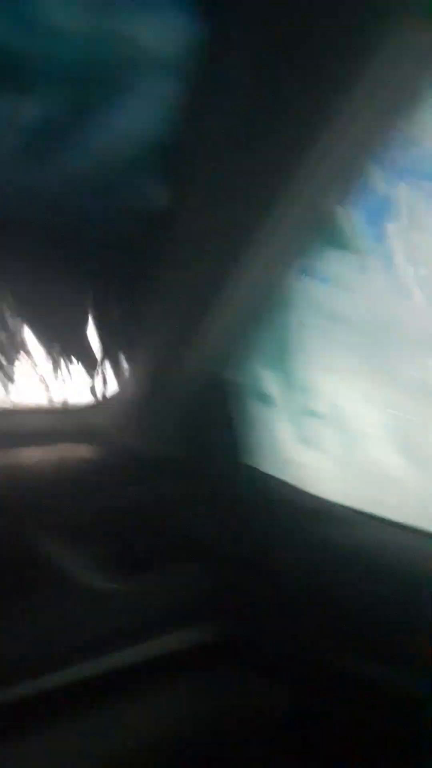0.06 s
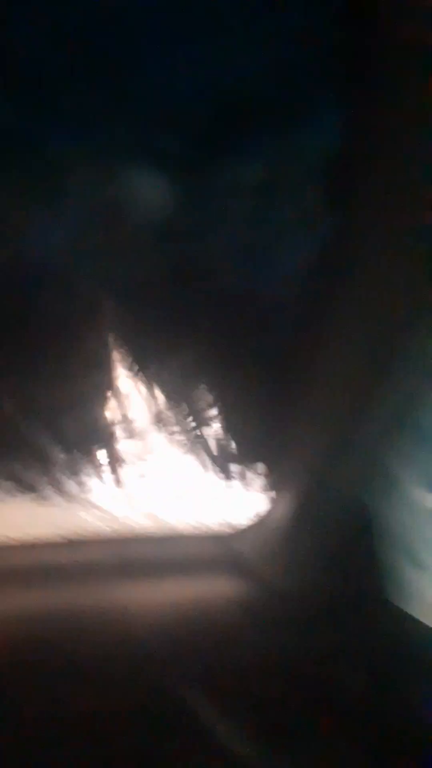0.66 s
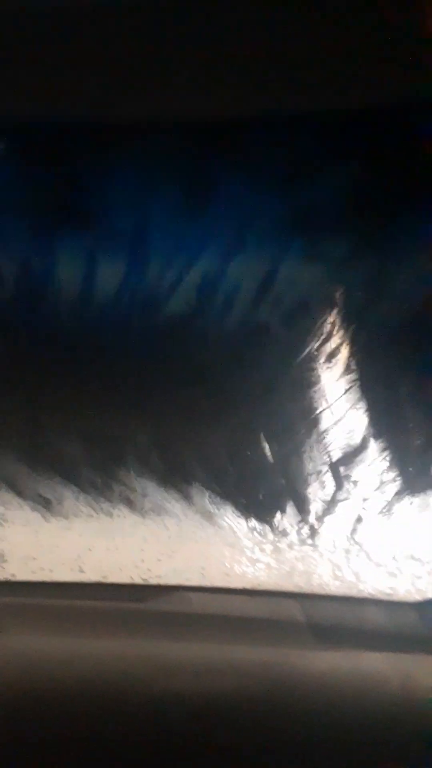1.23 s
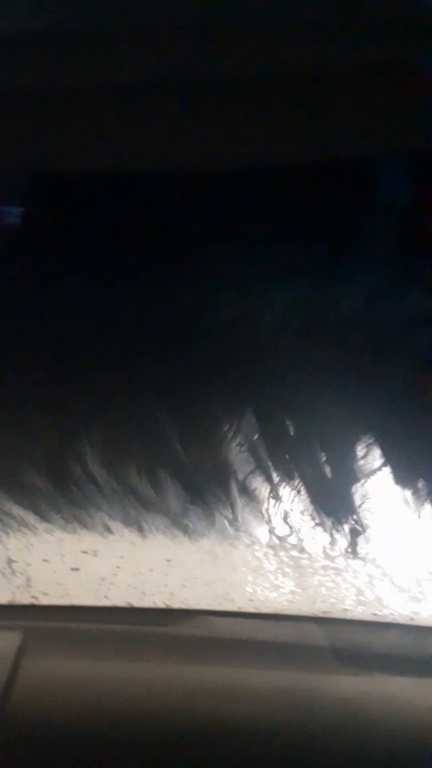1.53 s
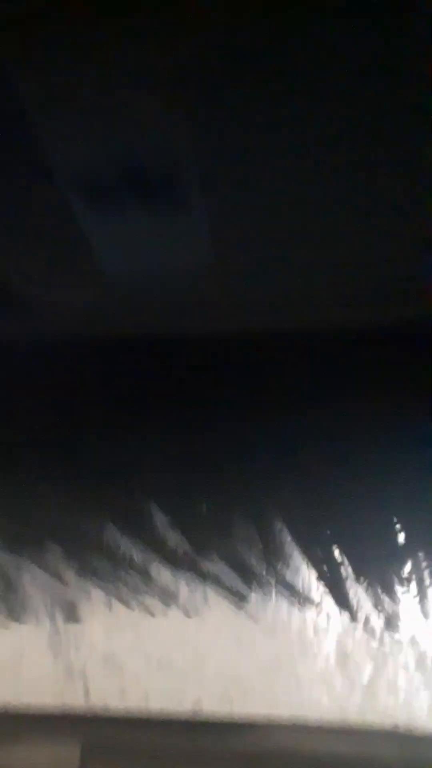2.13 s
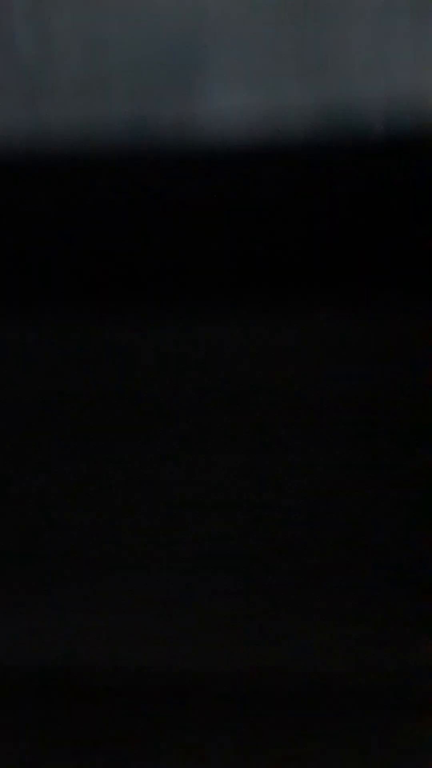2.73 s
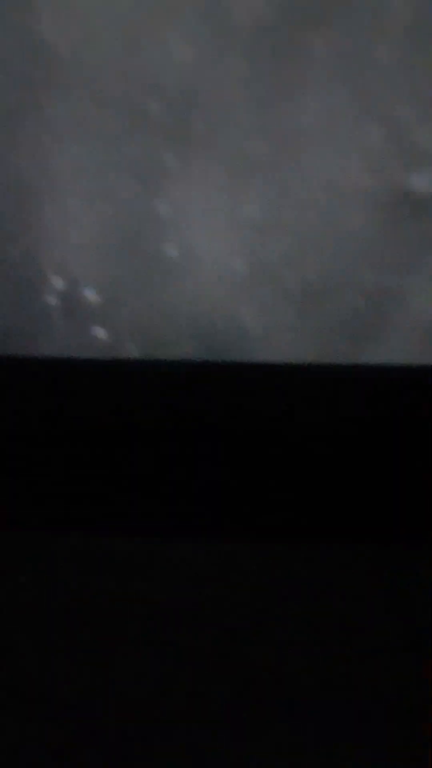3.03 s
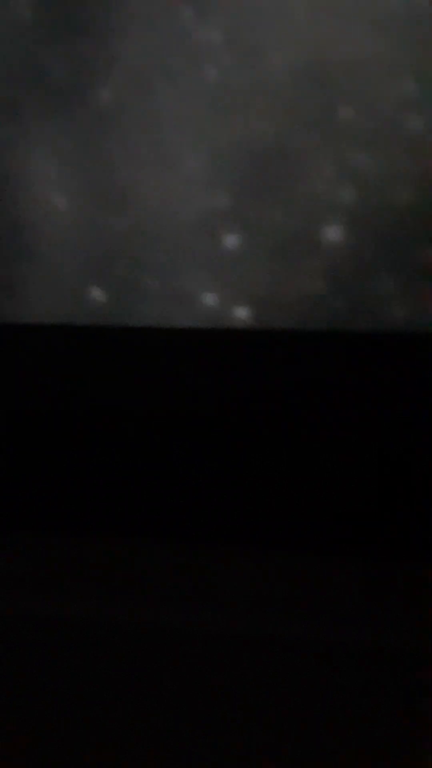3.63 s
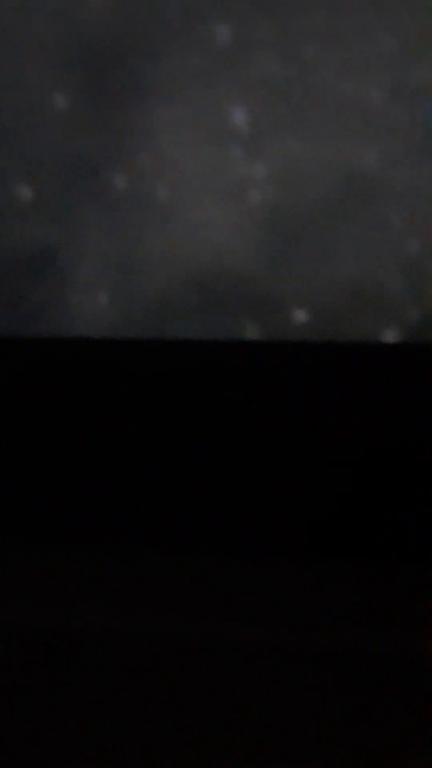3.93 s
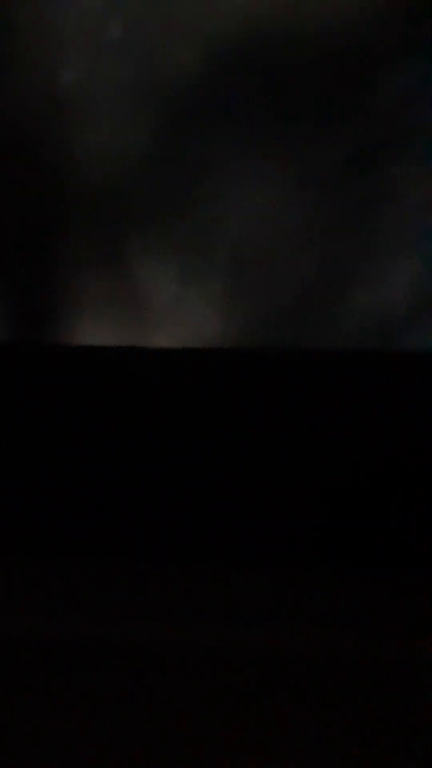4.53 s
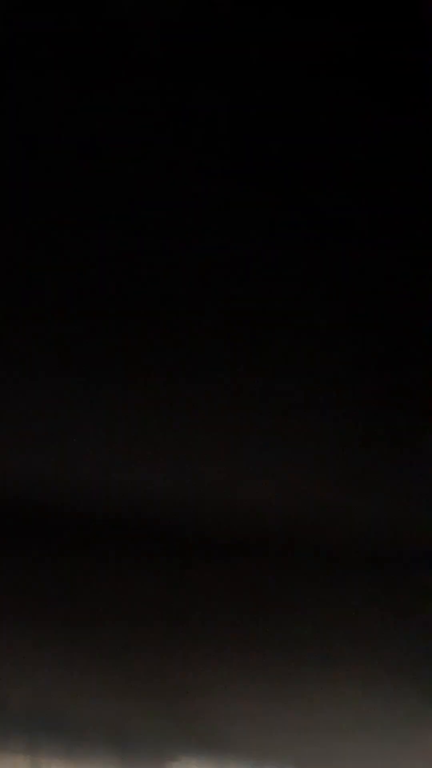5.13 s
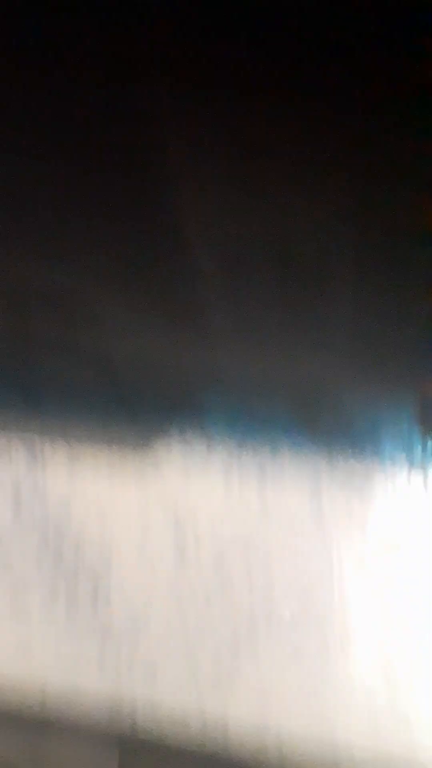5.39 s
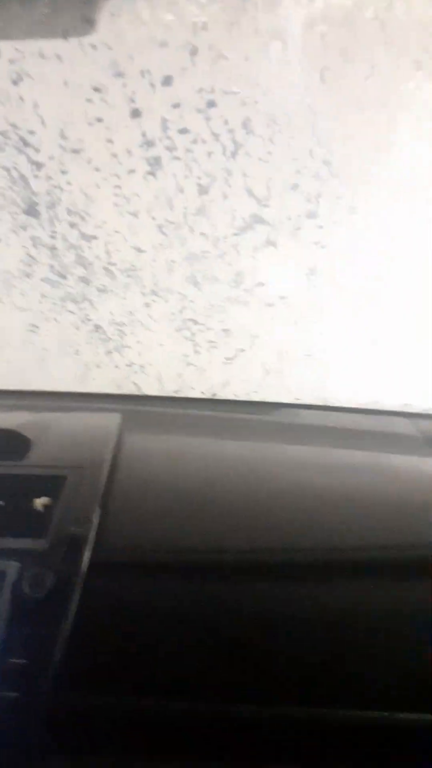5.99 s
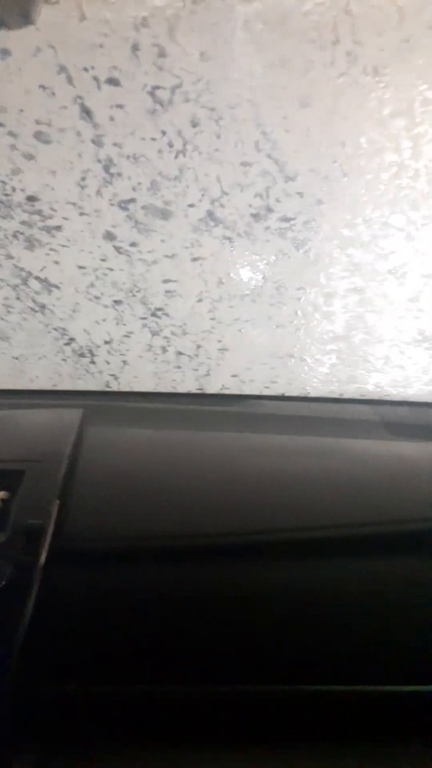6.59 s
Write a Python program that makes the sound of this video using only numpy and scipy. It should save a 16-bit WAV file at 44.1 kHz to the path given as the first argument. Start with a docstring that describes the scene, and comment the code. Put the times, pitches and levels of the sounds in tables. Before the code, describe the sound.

Muffled drumming rumble of car wash brushes heard from inside the car, with dull water spray and sharp drop ticks on the glass.

```python
"""Spinning cloth brushes drum on a closed car in a tunnel car wash, heard from inside.
Their many small blows make the windows, roof and panels ring and the cabin boom; dragging strips
make the roof drone. Spray hisses outside, dulled by the glass. Single drops tick sharply on the glass,
with short rustles and thin snaps close by. The two microphones swing toward a side window and back."""
import sys
import numpy as np
from scipy import signal
from scipy.fft import rfft, irfft
from scipy.io import wavfile
from scipy.ndimage import uniform_filter1d, minimum_filter1d

SR = 44100
rng = np.random.default_rng(int(sys.argv[2]) if len(sys.argv) > 2 else 0)


def store_wav(level_fs):
    """Save 16-bit WAV to argv[1]."""
    pcm = np.round(np.clip(np.atleast_2d(level_fs), -1, 1) * 32767)
    wavfile.write(sys.argv[1], SR, pcm.T.astype(np.int16))


N = 297675
TIME, HZ = np.arange(N) / SR, np.fft.rfftfreq(N, 1 / SR)

# tone of a drop hitting the glass: f/Hz, level/dB
DROP_TONE = [(800, -17), (2000, 0), (3000, 5.5), (4200, 4.5), (5400, 1.5), (6800, -3.5), (8200, -12.5),
             (9600, -31), (16000, -41)]


def brushes():
    """Cloth strips beat on the car, and each part rings at its own pitches."""
    # the pitches each part rings at: f/Hz, width/Hz, level/dB
    body_modes = [(54.6, 19, 0), (71.3, 14, -1)]
    boom_modes = [(90.7, 17, -10), (114.2, 26.5, 1)]
    window_modes = [(77.7, 25, -5.5), (149, 32, -11), (168.4, 43, 0.5), (199.5, 70, -11), (289, 71, -7.5)]
    roof_modes = [(218, 87, -14.5), (285, 99, -11.5), (329.3, 60, -3), (378, 70, -4)]
    panel_modes = [(435.2, 79, 2), (480.2, 62, -3), (554.3, 72, -3), (634, 130, -16), (690, 110, -15),
                   (830, 63, -14.5), (976, 77, -13.5)]
    # deep shudder of the car body: t/s, level/dB
    shudder = [(.2, -35.5), (.8, -36.5), (1.5, -34.5), (3.4, -37), (4.15, -33), (5, -36), (5.6, -34),
               (6.2, -40), (6.75, -37.5)]
    body = drumming(level(shudder), body_modes, per_s=540, spread_db=0.5, steady_s=0.16)
    boom = drumming(brush_force("boom"), boom_modes, per_s=500, spread_db=2, steady_s=0.076)
    windows = drumming(brush_force("windows"), window_modes, per_s=700, spread_db=1, steady_s=0.17)
    roof = drumming(brush_force("roof"), roof_modes, per_s=2500, spread_db=1.5, steady_s=0.053)
    panels = drumming(brush_force("panels"), panel_modes, per_s=3000, spread_db=0, steady_s=0.72)
    return body + gain_of(0.4) * boom + gain_of(0.83) * windows + roof + gain_of(1.5) * panels


def brush_force(part):
    """The passing brushes press on one part; slaps briefly add force to the boom and windows."""
    # steady push of the brushes: t/s, boom/dB, windows/dB, roof/dB, panels/dB
    pressure = [(0, -24.5, -22.5, -19, -28.5), (.4, -24, -16, -24, -33), (1.05, -22, -21.5, -20.5, -32),
                (1.5, -19.5, -21.5, -19.5, -30.5), (1.8, -20.5, -28, -19.5, -32),
                (2.2, -23, -25, -19, -29.5), (3.1, -24.5, -26, -16, -28), (3.65, -24, -25, -17.5, -24),
                (4.0, -24.5, -29.5, -15.5, -26.5), (4.6, -24.5, -26.5, -16.5, -26.5),
                (5.15, -23, -26, -16, -25.5), (5.85, -20.5, -28.5, -18, -31.5),
                (6.2, -21.5, -20.5, -18.5, -28), (6.75, -22, -28, -18.5, -28)]
    # heavy slaps of wet cloth: t/s, part hit, extra force/dB
    slaps = [(.3, "boom", 4.5), (.395, "boom", 11), (.397, "windows", 2), (.581, "boom", 6.5),
             (1.045, "boom", 6), (1.165, "windows", 5), (1.266, "boom", 6), (1.4, "boom", 6),
             (1.578, "boom", 7), (1.697, "boom", 6), (1.92, "boom", 3.5), (2.256, "windows", 2.5),
             (2.305, "boom", 7), (2.664, "boom", 5.5), (3.117, "boom", 7), (3.552, "boom", 8),
             (3.872, "boom", 8.5), (4.136, "boom", 8.5), (4.345, "boom", 6), (4.513, "boom", 8),
             (4.682, "boom", 6), (4.82, "boom", 6), (4.934, "boom", 5.5), (5.038, "boom", 7.5),
             (5.134, "boom", 7.5), (5.23, "boom", 5), (5.36, "boom", 5), (5.459, "boom", 6),
             (5.678, "boom", 3.5), (5.935, "boom", 5.5), (6.155, "boom", 4), (6.259, "boom", 7.5),
             (6.476, "boom", 4.5), (6.644, "boom", 6.5)]
    slap_s = {"boom": 0.042, "windows": 0.032}
    column = {"boom": 1, "windows": 2, "roof": 3, "panels": 4}[part]
    lift_db = sum(db * bump(s, slap_s[part]) for s, hit, db in slaps if hit == part)
    return level(pressure, column) * gain_of(lift_db)


def drumming(force, modes, per_s, spread_db, steady_s):
    """Random blows make one part ring; its loudness is steadied, then follows the force."""
    ringing = stereo(ring(patter(per_s, spread_db), modes))
    power = np.mean(ringing ** 2, axis=0)
    for _ in range(2):
        power = uniform_filter1d(power, int(steady_s * SR))
    return force * ringing / np.sqrt(abs(power) + 1e-20)


def roof_drone(waver_hz=4, flutter_db=1.5):
    """While a strip drags, the roof sings one note that wavers and slides in pitch."""
    # strips dragging on the roof: start/s, length/s, first f/Hz, last f/Hz, level/dB
    drags = [(.825, 0.094, 378, 368, -22.5), (.98, 0.072, 344.5, 316, -19), (1.165, .065, 310, 318, -19),
             (1.473, .08, 336, 317, -17.5), (1.599, .055, 317, 312, -20.5), (1.732, 0.067, 334, 352, -18.5),
             (1.883, .055, 338, 329, -13.5), (2.046, 0.087, 335, 315, -17.5), (2.196, .04, 341, 326, -21.5),
             (2.4, .09, 336.7, 334.7, -19), (2.646, .048, 334.6, 310, -19), (2.895, .075, 354, 337, -19.5),
             (2.985, .04, 323, 321, -16), (3.093, .06, 323, 332, -17.5), (3.147, .1, 330.2, 337, -18),
             (3.264, .055, 334.6, 326, -12.5), (3.356, 0.033, 331, 342, -14.5),
             (3.716, .06, 343.5, 339, -19), (3.858, 0.063, 314, 336, -13.5), (3.931, 0.045, 328, 327, -14),
             (4.036, .42, 298, 311.3, -21), (4.212, 0.044, 329, 306, -16.5),
             (4.444, .31, 310.6, 311.8, -17), (4.657, 0.041, 318, 326, -19),
             (4.831, .068, 373.5, 360, -16.5), (4.9, .055, 354, 329, -18),
             (5.062, 0.083, 336.6, 315, -22.5), (5.275, .048, 318.6, 315, -17.5),
             (5.402, .05, 331, 322, -17.5), (5.699, 0.063, 346, 344.5, -15.5),
             (5.861, 0.037, 337.4, 327, -19.5), (5.963, 0.047, 333, 340.5, -19),
             (6.035, .052, 334, 315, -14), (6.229, 0.059, 321.4, 334, -15.5), (6.396, .054, 335, 354, -21),
             (6.628, 0.044, 318.3, 317, -16)]
    slow_wobble = [(1, -6.5), (8, 1.5), (25, -13), (80, -72.5), (200, -140)]  # f/Hz, level/dB
    waver, flutter = unit_level(noise(slow_wobble))
    out = np.zeros(N)
    for s, length, first_hz, last_hz, db in drags:
        during = (TIME >= s) & (TIME < s + length)
        hz = np.linspace(first_hz, last_hz, during.sum()) + waver_hz * waver[during]
        swell = signal.windows.tukey(during.sum(), 0.6) * gain_of(flutter_db * flutter[during])
        out[during] += gain_of(db) * unit_level(swell * np.sin(2 * np.pi * np.cumsum(hz) / SR))
    return out


def spray(drops_per_s=9000, gust_db=1.22):
    """Countless drops wash over the glass in small gusts, under a thin hiss of mist."""
    # water on the car: t/s, wash/dB, mist/dB
    water = [(.1, -30.5, -63), (.37, -32, -69.5), (.46, -33, -72.5), (1, -33.5, -75), (1.8, -34.5, -76),
             (2.8, -35, -75), (3.5, -35.5, -75.5), (4.1, -35, -72), (4.6, -35, -71), (5.05, -34, -68.5),
             (5.5, -33.5, -72), (6, -33, -69.5), (6.4, -34, -69), (6.75, -33, -70)]
    # tone of the dull wash and of the fine mist: f/Hz, level/dB
    wash_tone = [(300, -14), (560, -1), (690, -1.5), (820, -0.5), (1100, -4.5), (1400, -6.5), (1800, -10),
                 (2400, -15.5), (2850, -16), (3900, -25.5), (5200, -31.5), (7000, -40.5), (8300, -46),
                 (9600, -60), (16000, -78.5)]
    mist_tone = [(3000, -10.5), (5500, 8), (7200, 9.5), (8400, 7), (9800, -2.5), (12300, 1), (14200, -1.5),
                 (16000, -2)]
    gusts = unit_level(filtered(rng.standard_normal(N), [(1, -2.5), (8, -8.5), (30, -13), (100, -86)]))
    drops = filtered(patter(drops_per_s, spread_db=3), wash_tone)
    wash = unit_level(mic_swing(stereo(drops))) * gain_of(gust_db * gusts)
    mist = unit_level(noise(mist_tone))
    return gain_of(3.5) * wash * level(water) + gain_of(7) * mist * level(water, column=2)


def drop_ticks():
    """Single drops hit the glass with a sharp tick."""
    # drops landing: t/s, level/dB, crack fade time/s
    hits = [(0.2964, -21, 0.0059), (0.3315, -33.5, 0.0032), (.401, -44, .003), (1.0869, -37.5, .003),
            (1.2435, -34.5, 0.0046), (1.39, -38, .004), (1.4895, -31.5, 0.0048), (1.695, -33, .001),
            (1.6975, -30, 0.004), (2.3366, -35, 0.0027), (2.407, -42, .002), (2.4835, -37.5, .004),
            (2.5135, -38, .004), (2.8968, -33, .003), (3.179, -43, .003), (3.2, -41, .003),
            (3.244, -35, .005), (3.398, -40.5, 0.0028), (3.5535, -37.5, .007), (3.575, -40, 0.0031),
            (3.835, -43, 0.0025), (3.8583, -38.5, .003), (3.937, -35.5, .004), (4.204, -43, .003),
            (4.348, -36.5, 0.0045), (4.376, -43, 0.0094), (4.55, -40.5, .004), (4.616, -41, .003),
            (4.6665, -36.5, .001), (4.669, -32.5, 0.004), (4.7092, -42, 0.0047), (4.956, -39, 0.0054),
            (5.029, -37.5, 0.0045), (5.311, -36, 0.0036), (5.34, -44, 0.0033), (5.3685, -35.5, 0.0034),
            (5.416, -35, 0.0033), (5.486, -38, .003), (5.5204, -39, .004), (5.591, -40, .003),
            (5.622, -37.5, 0.004), (5.7935, -33.5, 0.0027), (5.854, -44, .003), (5.9562, -30.5, 0.0051),
            (6.129, -38, 0.0062), (6.23, -42, .003), (6.336, -40, 0.0034), (6.429, -41, .003),
            (6.48, -38.5, .004)]
    return gain_of(-3.5) * ticks(hits, DROP_TONE, echo_s=0.21, echo_db=-12.5, spike_s=0.00095)


def ticks(hits, tone, echo_s, echo_db, spike_s):
    """Each tick is a spike, a brief crack and a cabin echo that falls 60 dB in echo_s."""
    t, out = np.arange(SR // 8) / SR, np.zeros((2, N))
    spike = gain_of(-2) * np.exp(-t / spike_s)
    echo = gain_of(echo_db - 60 * t / echo_s)
    onset = 1 - np.exp(-t / 0.0001)
    for s, db, crack_s in hits:
        add(out, s, gain_of(db) * (spike + np.exp(-t / crack_s) + echo) * onset)
    return out * unit_level(noise(tone))


def rustles():
    """Short clumps of tiny ticks blur into rustles."""
    # rustles close by: middle/s, length/s, level/dB
    clumps = [(1.388, 0.047, -47), (2.53, 0.085, -49), (2.69, .07, -51.5), (3.23, 0.13, -56),
              (3.567, 0.051, -52), (3.896, 0.15, -54), (4.695, 0.077, -51), (5.622, 0.058, -52),
              (5.9, 0.044, -44), (6.536, 0.044, -43.5)]
    swell = sum(gain_of(db) * bump(s, length) for s, length, db in clumps)
    return swell * unit_level(filtered(patter(per_s=2500, spread_db=4), DROP_TONE))


def stray_drops(crack_s=.005, echo_s=0.12, echo_db=-9):
    """Faint drops tick on the glass throughout, louder toward the end."""
    # loudness of the stray drops: t/s, level/dB
    loudness = [(0, -63), (.6, -61), (1.4, -57.5), (2, -61), (2.6, -62), (3.4, -61.5), (4.1, -59),
                (4.7, -55), (5.3, -53.5), (5.9, -52.5), (6.75, -56)]
    t = np.arange(SR // 16) / SR
    shape = np.exp(-t / crack_s) + gain_of(echo_db - 60 * t / echo_s)
    blows = np.tanh(abs(patter(per_s=50, spread_db=2)[0]) / 1.5)  # none is much larger than the rest
    power = signal.fftconvolve(blows ** 2, shape ** 2)[:N]
    return level(loudness) * unit_level(np.sqrt(abs(power)) * noise(DROP_TONE))


def near_glass(sound):
    """Close sounds gain a faint glassy ring and shift sideways as the microphones swing."""
    # ring of the glass: f/Hz, width/Hz, level/dB
    glass_modes = [(2530, 50, -0.5), (3780, 59, 1), (5020, 77, 3), (5370, 60, -2), (6040, 56, 0.5),
                   (6700, 89, -1.5)]
    # which side is louder: t/s, left minus right/dB
    balance = [(0, -3), (1.6, 1), (2.3, -2), (2.9, -5), (3.6, -6), (4.4, -5.5), (5.4, -1.5), (6, 3),
               (6.75, 3)]
    ringing = sound + gain_of(-1) * ring(sound, glass_modes)
    return ringing * level(balance) ** np.array([[.5], [-.5]])


def snaps():
    """A few tiny bursts of noise make thin, high snaps."""
    # the snaps: t/s, level/dB, crack fade time/s
    hits = [(0.2964, -51, .003), (3.888, -59.5, .005), (4.669, -59, .003), (5.436, -50, .0033)]
    # their bright tone: f/Hz, level/dB
    tone = [(4000, -28), (8000, -6), (9500, -4.5), (13000, -11), (16000, -9.5)]
    return ticks(hits, tone, echo_s=.09, echo_db=-9.5, spike_s=.001)


def mic_swing(x):
    """As the microphones turn, sound reaches one of them first."""
    # the swing to a side window and back: t/s, delay of left behind right/s
    delays = [(0, -.00012), (1, -.00004), (1.75, -.00003), (2.25, .0001), (2.8, .00028), (4.7, .00028),
              (5.3, .00025), (5.65, -.00012), (6.75, -.00009)]
    lag = np.interp(TIME, *np.transpose(delays))
    return np.array([np.interp(TIME - lag / 2, TIME, x[0]), np.interp(TIME + lag / 2, TIME, x[1])])


def stereo(x):
    """Two unrelated signals become left and right: alike in the bass, apart in the treble."""
    # how alike the two microphones sound: f/Hz, likeness from 0 to 1
    likeness = [(30, .92), (55, .98), (120, .99), (170, .97), (250, .93), (330, .89), (420, .8), (560, .6),
                (900, .2), (2000, 0), (5000, .15), (16000, 0)]
    same = by_frequency(likeness)
    mid, side = rfft(x) * np.sqrt([1 + same, 1 - same])
    return irfft(np.array([mid + side, mid - side]), N)


def ring(x, modes):
    """Each blow sets off notes (modes) that swell and die away; wider ones die sooner."""
    f = HZ + 1e-3
    response = sum((-1j) ** k * gain_of(db) / (1 + 1j * (f ** 2 - hz ** 2) / (f * width)) ** 2
                   for k, (hz, width, db) in enumerate(modes))
    return irfft(rfft(x) * response, N)


def patter(per_s, spread_db):
    """Two unrelated streams of random blows of uneven size."""
    blows = (rng.random((2, N)) < per_s / SR) * rng.choice([-1., 1.], (2, N))
    return blows * gain_of(spread_db * rng.standard_normal((2, N)))


def noise(tone):
    """Two unrelated noises with the given tone."""
    return filtered(rng.standard_normal((2, N)), tone)


def filtered(x, tone):
    """Shapes a sound by a table of f/Hz, level/dB."""
    return irfft(rfft(x) * gain_of(by_frequency(tone)), N)


def by_frequency(points):
    """Fills in a table of f/Hz, value at every frequency."""
    hz, value = np.transpose(points)
    return np.interp(np.log(HZ + 1), np.log(hz + 1), value)


def level(rows, column=1):
    """Turns a table of t/s, level/dB into a gain at every sample."""
    columns = np.transpose(rows)
    return gain_of(np.interp(TIME, columns[0], columns[column]))


def bump(middle_s, length_s):
    """A smooth rise and fall."""
    return np.exp(-(2 * (TIME - middle_s) / length_s) ** 2)


def gain_of(db):
    """Turns decibels into a multiplier."""
    return 10 ** (np.asarray(db) / 20)


def unit_level(x):
    """Scales to an average (rms) level of 1."""
    return x / np.sqrt(np.mean(x ** 2) + 1e-20)


def add(mix, s, sound):
    """Mixes a sound in at s seconds."""
    part = mix[..., round(s * SR):][..., :sound.shape[-1]]
    part += sound[..., :part.shape[-1]]


def scene():
    """Brushes, water and small close sounds, heard from the front seat."""
    beating = brushes()
    close = near_glass(drop_ticks() + rustles() + stray_drops()) + snaps()
    return mic_swing(beating + gain_of(-0.77) * roof_drone()) + spray() + close


def record(dry, low_cut_hz=29, high_cut_hz=15800, ceiling=.92):
    """Each microphone has its own tone; peaks are held down and the lowest and highest notes lost."""
    # which microphone is louder: f/Hz, left minus right/dB
    balance = [(40, 1.5), (75, 2.2), (110, 0.7), (180, 2.5), (310, 3), (530, 5), (920, 0.5), (1800, -1),
               (2500, 1.5), (3800, -0.5), (5200, -4), (6800, -2), (7900, 2.5), (9500, 10), (12000, 10.5),
               (16000, 5.5)]
    # how far the wave at the left microphone is ahead: f/Hz, phase/rad
    lead = [(70, -.2), (110, -.05), (170, -.12), (260, -.07), (340, -.15), (700, 0)]
    dry = dry * signal.windows.tukey(N, .002)
    side = np.array([[.5], [-.5]])
    low_cut = HZ ** 2 / np.hypot(HZ ** 2, low_cut_hz ** 2)
    mics = gain_of(side * by_frequency(balance)) * np.exp(1j * side * by_frequency(lead))
    heard = irfft(rfft(dry) * low_cut * mics, N)
    safe_gain = np.minimum(ceiling / (abs(heard).max(axis=0) + 1e-9), 1)
    heard *= uniform_filter1d(minimum_filter1d(safe_gain, size=601), size=601)
    high_cut = signal.firwin(511, high_cut_hz, window=("kaiser", 9), fs=SR)
    return signal.oaconvolve(heard, high_cut[None], "same")


dry = scene()
out = record(dry)
store_wav(out)
```